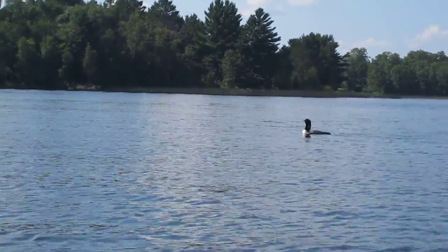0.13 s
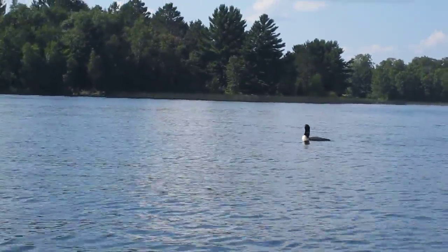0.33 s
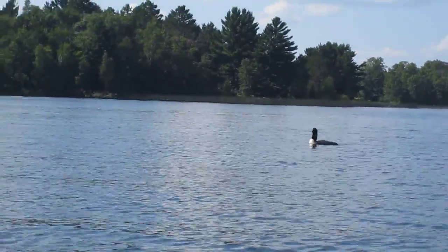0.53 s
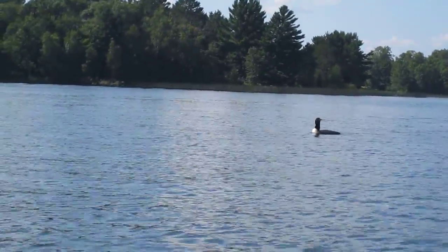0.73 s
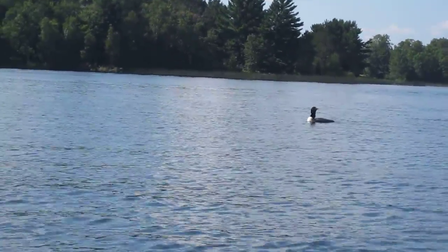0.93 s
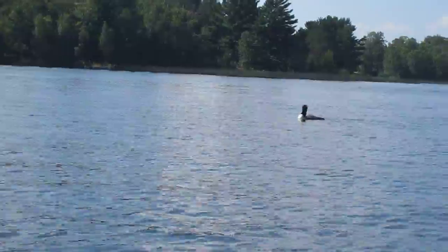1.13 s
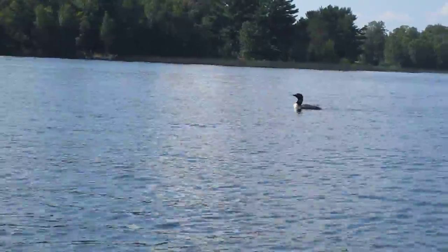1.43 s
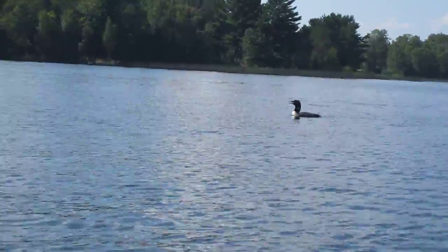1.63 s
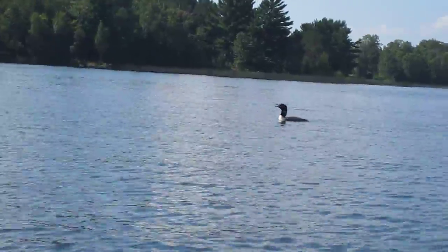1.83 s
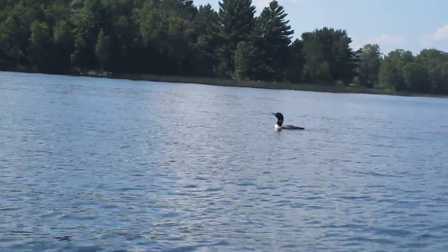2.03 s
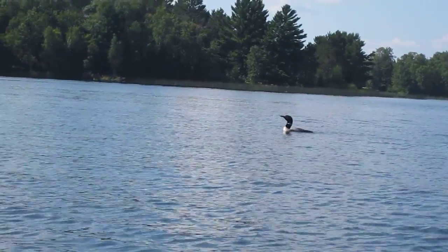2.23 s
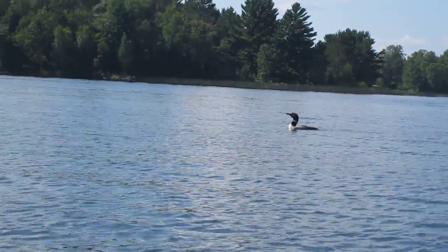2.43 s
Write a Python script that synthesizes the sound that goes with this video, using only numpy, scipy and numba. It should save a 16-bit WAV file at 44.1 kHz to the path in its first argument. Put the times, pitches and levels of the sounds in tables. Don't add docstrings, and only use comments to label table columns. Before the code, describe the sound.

A loon gives two short, quavering tremolo calls over the soft hush of a lake

```python
import sys
import numpy as np
from scipy import signal
from scipy.io import wavfile
from scipy.ndimage import uniform_filter1d
from numba import njit

SR = 44100
rng = np.random.default_rng(int(sys.argv[2]) if len(sys.argv) > 2 else 0)


def generate_wav(signal):
    frames = np.transpose(np.atleast_2d(signal))
    scaled = np.clip(frames, -1, 1) * 32767
    pcm = np.round(scaled).astype(np.int16)
    wavfile.write(sys.argv[1], SR, pcm)


def magnitude_from_level(level_db):
    exponent = np.asarray(level_db, float) / 20
    return 10 ** exponent


N = 114660
T = np.arange(N) / SR

# t/s, pitch f/Hz, effort level/dB, brightness level/dB
FIRST_QUAVER = [(.325, 1160, -6, -40), (.353, 1198, -8, -42), (.403, 888, -16.5, -48),
                (.455, 1208, -6, -39), (.500, 880, -17.5, -45.5), (.554, 1206, -5.5, -37.5),
                (.604, 870, -18, -48.5), (.656, 1177, -6, -36.5), (.706, 893, -17.5, -44.5),
                (.724, 893, -21.5, -64.5), (.771, 1065, -11, -39.5), (.820, 896, -23.5, -66)]
SECOND_QUAVER = [(1.77, 1211, -15.5, -63.5), (1.815, 1212, -5, -43.5), (1.860, 919, -16.5, -50),
                 (1.908, 1233, -2.5, -39), (1.958, 938, -17, -52), (2.004, 1232, -5.5, -43),
                 (2.057, 925, -17.5, -51.5), (2.105, 1219, -4.5, -42), (2.157, 910, -17.5, -53),
                 (2.206, 1175, -8.5, -41.5), (2.257, 916, -17, -60.5), (2.308, 976, -18, -58),
                 (2.35, 907, -26, -79.5)]
# start t/s, end t/s, dead spot f/Hz, breadth of the tops [ratio], dead spot drift [Hz/s]
WHISTLES = [
    (0.3465, 0.834, 1046, 1.02, 36),
    (1.793, 2.355, 1042, 1.22, 34),
]
# multiple of the pitch, level/dB
WHISTLE_OVERTONES = [
    [(2, 6.5), (3, 0), (4, 1), (5, -9.5), (6, -15), (7, -13), (8, -18.5), (9, -19), (10, -30.5),
     (11, -18.5), (12, -30)],
    [(2, 6), (3, -1), (4, 0.5), (5, 0.5), (6, -16.5), (7, -6.5), (8, -9.5), (9, -13), (10, -36), (11, -23),
     (12, -32)],
]
# t/s, pitch f/Hz, first partial level/dB, second partial level/dB, brightness level/dB
OPENINGS = [
    [(0.236, 687, -22, -34, -35), (0.244, 699, -25, -16.5, -27.5), (0.262, 728.5, -22, -18, -20),
     (0.284, 700, -23, -25.5, -21), (0.304, 651, -27.5, -33.5, -33.5), (0.32, 690, -23.5, -29.5, -13.5),
     (0.332, 779, -17, -19, -10), (0.342, 832, -17, -24, -24), (0.347, 885, -36.5, -14.5, -20)],
    [(1.693, 697.3, -21, -46, -33), (1.699, 682, -27.5, -17.5, -28), (1.705, 716, -23.5, -16, -23),
     (1.721, 742, -19, -14, -17.5), (1.739, 727, -20.5, -23, -24), (1.763, 664, -25, -31.5, -27),
     (1.777, 702, -18, -25, -12), (1.787, 786, -17.5, -23, -11), (1.794, 854, -21.5, -19.5, -13)],
]
# multiple of the pitch, level/dB
OPENING_OVERTONES = [
    [(3, -20.5), (4, -32.5), (5, -26.5), (6, -24.5), (7, -29.5), (8, -29), (9, -34), (10, -34), (11, -39),
     (12, -36.5), (13, -47), (14, -46), (15, -49), (16, -47), (17, -58), (18, -54.5), (19, -48.5)],
    [(3, -28.5), (4, -33), (5, -31.5), (6, -28.5), (7, -28.5), (8, -28), (9, -34), (10, -42), (11, -30),
     (12, -38), (13, -47), (14, -43), (15, -51), (16, -43), (17, -57.5), (18, -57), (19, -46.5)],
]
# f/Hz, width f/Hz, level/dB
FIRST_THROAT = [(2150, 260, -16), (2380, 190, -6.5), (2600, 290, -1), (3194, 336, 12), (3420, 340, -1.5),
                (4550, 370, -8), (5000, 150, 5.5), (5600, 250, 1.5), (5870, 220, -13.5), (6500, 280, -7.5),
                (7300, 500, -3.5), (7100, 510, -6), (8500, 530, 4), (9100, 570, -11), (10010, 700, 10),
                (12000, 780, -1.5), (13400, 800, 1)]
SECOND_THROAT = [(2000, 360, -7.5), (2316, 170, -8), (2600, 250, 3), (3100, 340, 7.5), (3390, 270, 4),
                 (4670, 500, -4.5), (5145, 130, 8.5), (5420, 220, 5), (5750, 250, -16), (6400, 400, -6.5),
                 (7100, 640, -8), (8220, 300, -12), (8500, 400, 4.5), (9550, 400, -2), (10170, 500, 9),
                 (11900, 780, -8), (13400, 800, 0)]
# start t/s, length t/s, pitch f/Hz, first partial level/dB, second partial level/dB
CROAKS = [
    (0.227, 0.0077, 501, -40, -27),
    (0.812, 0.061, 644.7, -35, -37),
    (1.678, .02, 614, -37.5, -35),
    (2.344, 0.017, 626, -33.5, -31),
]
# f/Hz, level/dB per Hz
HUSH_COLOUR = [(30, -29), (60, -4.5), (300, 3), (1200, 5.5), (2300, -6.5), (2800, -12), (5000, -23.5),
               (15500, -33)]
# t/s, level/dB
HUSH_SWELL = [(0, 0.5), (.9, 0.5), (1.3, 0.2), (1.65, -0.05), (2.3, -0.7), (2.6, -2)]
# t/s, level/dB
GUSTS = [(.015, -70), (.38, -61), (.66, -62), (1.47, -54), (1.59, -64), (2.17, -45.5), (2.345, -53)]
# multiple of the motor's turning rate, level/dB
MOTOR_LINES = [(2, -62.5), (3, -54.5), (4, -63.5), (6, -48.5), (9, -52.5), (10, -49), (12, -52), (13, -51),
               (17, -76.5), (18, -50), (19, -61), (20, -56), (24, -86), (26, -66), (28, -57), (31, -59),
               (32, -80), (40, -68)]
# multiple of the fan's rate, level/dB
FAN_LINES = [(1, -53.5), (2, -45)]
# f/Hz, width f/Hz, level/dB
CASING = [(3460, 120, -72.5), (5430, 110, -73.5), (5550, 120, -66), (5820, 160, -71.5), (6160, 110, -76),
          (7800, 180, -73), (8900, 230, -77.5), (10750, 320, -78)]

RISE_HZ_PER_S = 9200


def whistle(rows, orders, throat, start, end, dead_hz, breadth, drift):
    overshoot_hz, settle_s, waver = 50.2, 0.0044, 0.0027
    break_s, fade_s, pop_db, pop_s = 0.0039, 0.019, -1, 0.005
    since_start = np.maximum(T - start, 0)
    hz, effort_db, bright_db = quaver(rows, breadth)
    rising = np.clip(np.gradient(hz) * SR / RISE_HZ_PER_S, 0, 1)
    hz = hz * (1 + waver * slow(150)) + overshoot_hz * np.exp(-since_start / settle_s)
    turns = 2 * np.pi * np.cumsum(hz) / SR

    dead_hz = dead_hz + 25 * rising + drift * (T - (start + end) / 2)
    width_hz = np.where(hz > dead_hz, 78, 66) * (1 - 0.12 * rising)
    tone = np.tanh((hz - dead_hz) / width_hz) * np.sin(turns) + 0.014 * np.cos(turns)
    tone = tone * magnitude_from_level(3 * rising / (1 + ((hz - dead_hz - 71) / 18) ** 2))

    tilt_db = -0.73 * np.maximum(1206 - hz, 0) / 100 - rising
    upper = overtones(hz, turns, orders, tilt_db, 3.03, throat)
    voice = magnitude_from_level(effort_db) * tone + magnitude_from_level(bright_db + 4.5 * rising) * upper
    push_db = pop_db * np.exp(-np.maximum(since_start - break_s, 0) / pop_s) - 1.5 * rising
    if_late = np.maximum(T - start - break_s, 0)
    push_db = pop_db * np.exp(-if_late / pop_s) - 1.5 * rising
    air = magnitude_from_level(-55) * follow(rising, 0.9, 1 / (0.02 * SR)) * breath()
    return np.sqrt(2) * (magnitude_from_level(push_db) * voice + air) * gate(start, end, break_s, fade_s)


def quaver(rows, breadth):
    s, *cols = np.transpose(rows)
    k = np.clip(np.searchsorted(s, T) - 1, 0, len(s) - 2)
    swing = np.sin(np.pi / 2 * np.clip((T - s[k]) / (s[k + 1] - s[k]), 0, 1)) ** 2
    up = cols[0][k + 1] > cols[0][k]
    broad = np.where(up, 1 - (1 - swing) ** (1.4 * breadth), swing ** (1.4 * breadth))
    bright_shape = np.where(up, swing ** 0.58, 1 - (1 - swing) ** 0.58)
    return [v[k] + (v[k + 1] - v[k]) * shape for v, shape in zip(cols, (broad, broad, bright_shape))]


def opening(rows, orders, throat):
    s, *cols = np.transpose(rows)
    hz, first_db, second_db, bright_db = (uniform_filter1d(np.interp(T, s, c), 200) for c in cols)
    turns = 2 * np.pi * np.cumsum(hz) / SR
    rising = uniform_filter1d(np.clip(np.gradient(hz) * SR / RISE_HZ_PER_S, 0, 1), 400)
    upper = overtones(hz, turns, orders, -2 * rising, 2.5, throat) * magnitude_from_level(6.5 * rising)
    upper = upper + magnitude_from_level(-38.5 - 1.5 * rising) * breath()
    voice = magnitude_from_level(first_db) * np.sin(turns) + magnitude_from_level(second_db) * np.cos(2 * turns) + magnitude_from_level(bright_db) * upper
    return np.sqrt(2) * voice * gate(s[0] - 0.003, s[-1] + 0.0028, 0.0095, 0.0071)


def croak(start, length, hz, first_db, second_db):
    sag_hz_per_s, edge_db, roughness = 1300, -26, 0.45
    turns = 2 * np.pi * np.cumsum(hz - sag_hz_per_s * np.clip(T - start, 0, length)) / SR
    voice = magnitude_from_level(first_db) * np.sin(turns) + magnitude_from_level(second_db) * np.cos(2 * turns)
    voice = voice + magnitude_from_level(first_db + edge_db) * (np.sin(5 * turns) + np.cos(6 * turns))
    rough = 1 + roughness * slow(220)
    return np.sqrt(2) * voice * rough * gate(start, start + length, 0.0043, min(0.012, length / 3))


def overtones(hz, turns, orders, tilt_db, flicker_db, throat):
    total = 0
    for k, db in orders:
        throat_db = sum(lift / (1 + (2 * (k * hz - f) / width) ** 2) for f, width, lift in throat)
        level_db = db + tilt_db * k + flicker_db * slow(200) + throat_db
        total = total + magnitude_from_level(level_db) * np.sin(k * turns + 2 * np.pi * rng.random())
    return total


def breath():
    low_hz = 2550
    band = signal.butter(1, [low_hz, 2.1 * low_hz], "band", fs=SR, output="sos")
    return evened(signal.sosfilt(band, rng.standard_normal(N)))


def shore(x):
    level_db, t60_s = -33.5, 0.19
    t = np.arange(SR // 4) / SR
    tail = rng.standard_normal(len(t)) * magnitude_from_level(-60 * t / t60_s) * (t > 0.004)
    return magnitude_from_level(level_db) * signal.fftconvolve(x, tail / np.linalg.norm(tail))[:N]


def lake():
    frames, hz = N // 256 + 5, np.fft.rfftfreq(1024, 1 / SR)
    a, b, patches = rng.standard_normal((frames, 513, 3)).T
    patches = evened(uniform_filter1d(uniform_filter1d(patches, 10, 0), 12, 1))
    f, db = np.transpose(HUSH_COLOUR)
    colour_db = np.interp(np.log(hz + 1), np.log(f), db)[:, None]
    z = (a + 1j * b) * magnitude_from_level(colour_db + 0.8 * patches)
    hush = signal.istft(z, nperseg=1024, noverlap=768)[1][:N]
    return evened(hush) * magnitude_from_level(-38 + np.interp(T, *np.transpose(HUSH_SWELL)))


def wind():
    band = signal.butter(2, [38, 99], "band", fs=SR, output="sos")
    rumble = evened(signal.sosfilt(band, rng.standard_normal(N)))
    bumps = sum(magnitude_from_level(db) * np.exp(-((T - s) / 0.044) ** 2) for s, db in GUSTS)
    return rumble * (magnitude_from_level(-60.5 + 2 * slow(6.2)) + bumps)


def camera():
    motor_hz, fan_hz, waver_db, scan_hz, scan_db = 63.95, 158, 1.3, 15734, -86
    lines = [(k * motor_hz, db) for k, db in MOTOR_LINES] + [(k * fan_hz, db) for k, db in FAN_LINES]
    hum = magnitude_from_level(scan_db) * np.sin(2 * np.pi * scan_hz * T)
    for f, db in lines:
        hum = hum + magnitude_from_level(db + waver_db * slow(13)) * np.sin(2 * np.pi * (f * T + rng.random()))
    whirr = 0
    for f, width, db in CASING:
        ring = signal.lfilter(*signal.iirpeak(f, f / width, fs=SR), rng.standard_normal(N))
        whirr = whirr + magnitude_from_level(db) * evened(ring)
    return np.sqrt(2) * hum + whirr


def evened(x):
    return x / np.sqrt(np.mean(x ** 2) + 1e-20)


def slow(rate_hz):
    rates = np.geomspace(rate_hz / 20, rate_hz, 12)
    return evened(sum(np.sin(2 * np.pi * (f * T + rng.random())) / np.sqrt(f) for f in rates))


def gate(start, end, rise, fall):
    ramp = np.minimum((T - start) / rise, (end - T) / fall)
    return np.sin(np.pi / 2 * np.clip(ramp, 0, 1)) ** 2


@njit
def follow(x, up, down):
    y = np.zeros(len(x))
    for i in range(1, len(x)):
        y[i] = y[i - 1] + (up if x[i] > y[i - 1] else down) * (x[i] - y[i - 1])
    return y


def scene():
    throats = (FIRST_THROAT, SECOND_THROAT)
    loon = sum(opening(*call) for call in zip(OPENINGS, OPENING_OVERTONES, throats))
    loon = loon + sum(croak(*row) for row in CROAKS)
    loon = loon + whistle(FIRST_QUAVER, WHISTLE_OVERTONES[0], FIRST_THROAT, *WHISTLES[0])
    loon = loon + whistle(SECOND_QUAVER, WHISTLE_OVERTONES[1], SECOND_THROAT, *WHISTLES[1])
    return (loon + shore(loon) + lake() + wind() + camera())[None]


def low_pass(x):
    return signal.sosfilt(signal.butter(12, 15680, fs=SR, output="sos"), x)


def record(dry):
    knee_db, squeeze, duck_s, recover_s = -16, 0.96, 0.0044, 0.015
    power_db = 10 * np.log10(abs(uniform_filter1d(dry[0] ** 2, 88)) + 1e-12)
    over_db = squeeze * np.maximum(power_db - knee_db, 0)
    cut_db = follow(over_db, 1 / (duck_s * SR), 1 / (recover_s * SR))
    edge = signal.firwin(numtaps=4095, cutoff=15750, window=("kaiser", 8), fs=SR)
    mix = signal.oaconvolve(dry / magnitude_from_level(cut_db), edge[None], "same")
    return low_pass(mix)


dry = scene()
out = record(dry)
generate_wav(out)
```